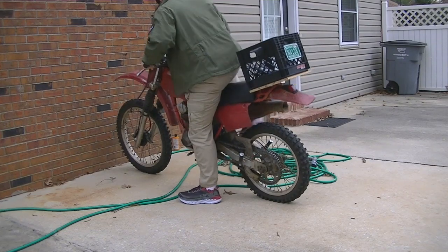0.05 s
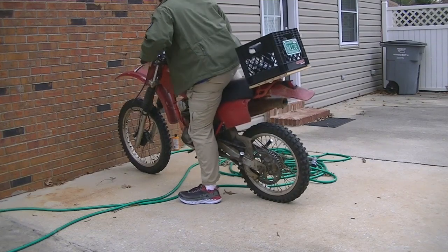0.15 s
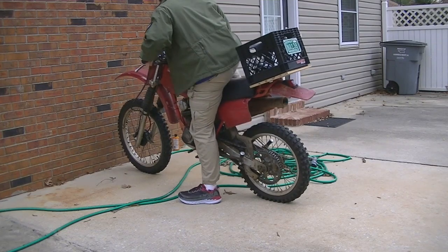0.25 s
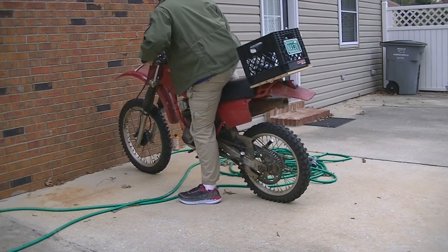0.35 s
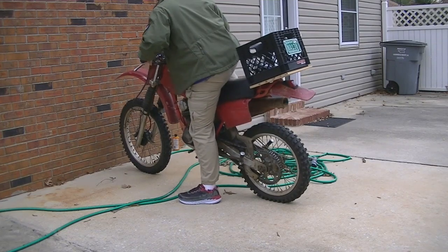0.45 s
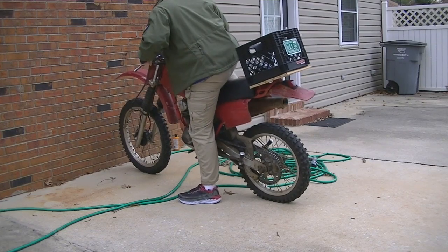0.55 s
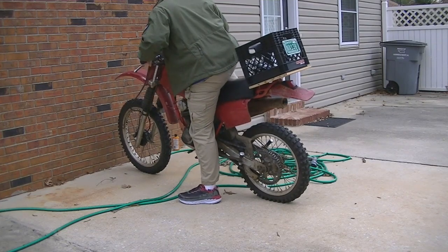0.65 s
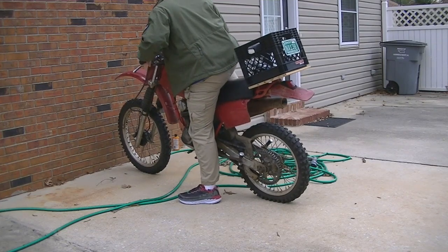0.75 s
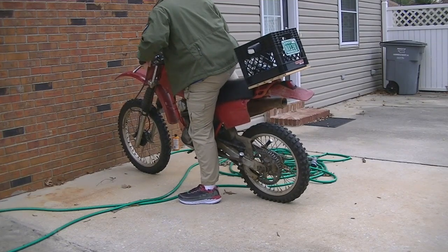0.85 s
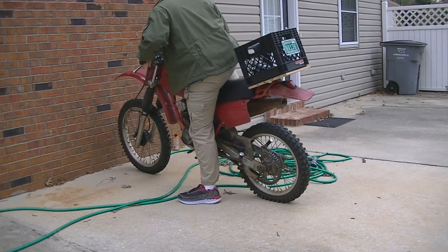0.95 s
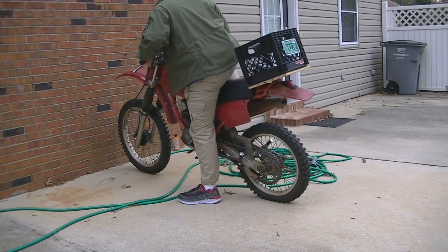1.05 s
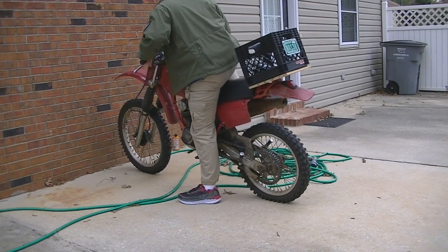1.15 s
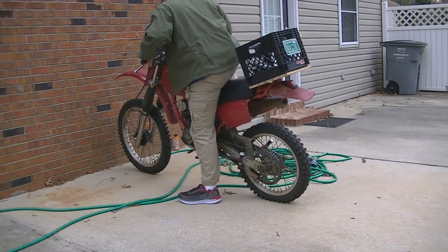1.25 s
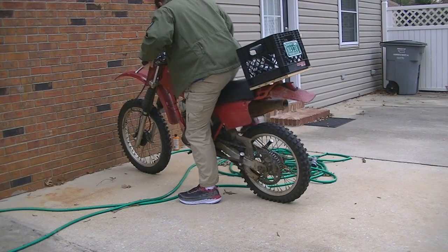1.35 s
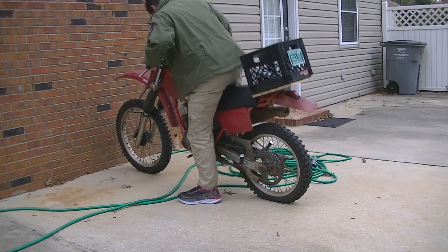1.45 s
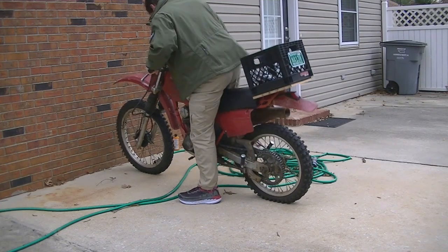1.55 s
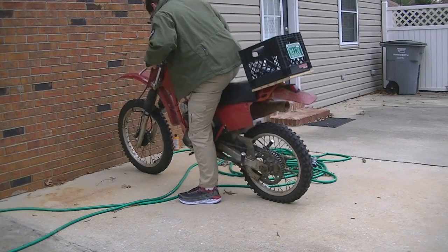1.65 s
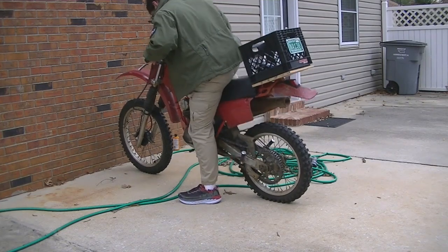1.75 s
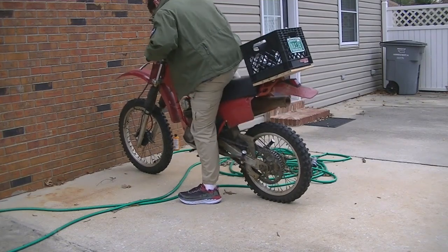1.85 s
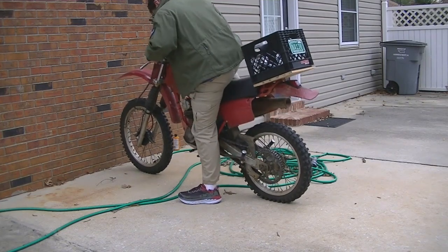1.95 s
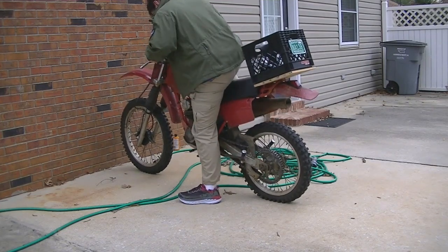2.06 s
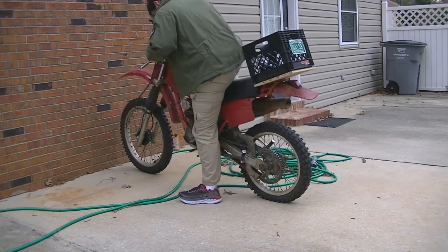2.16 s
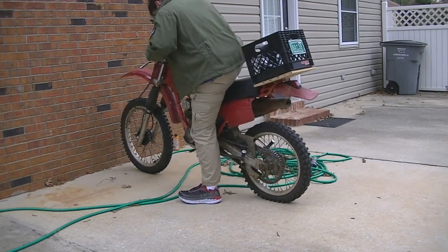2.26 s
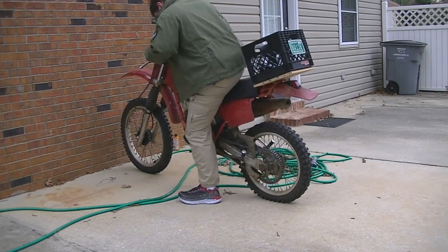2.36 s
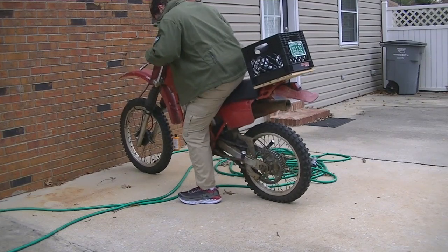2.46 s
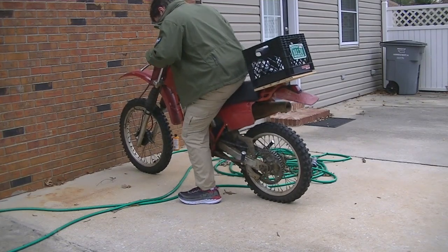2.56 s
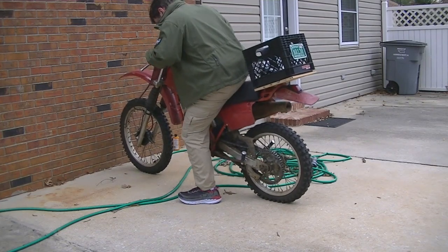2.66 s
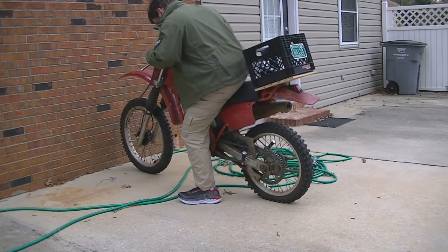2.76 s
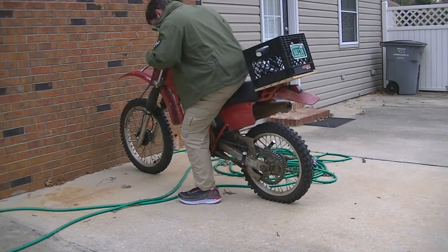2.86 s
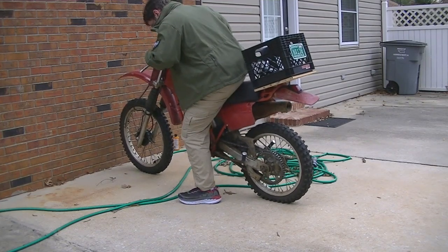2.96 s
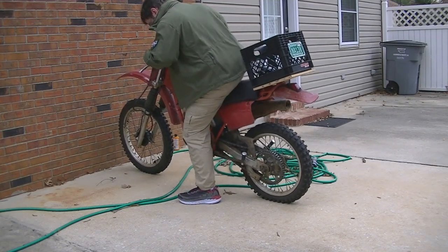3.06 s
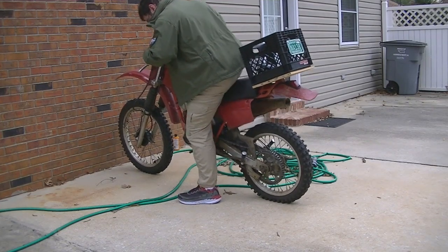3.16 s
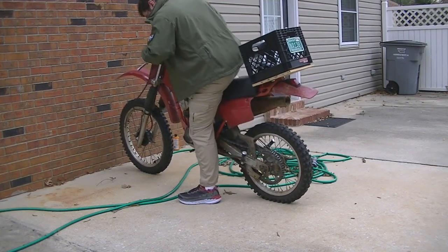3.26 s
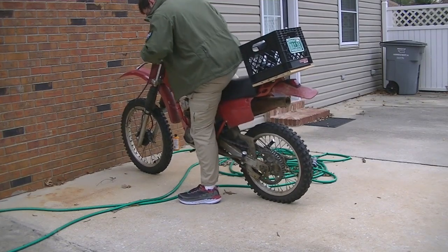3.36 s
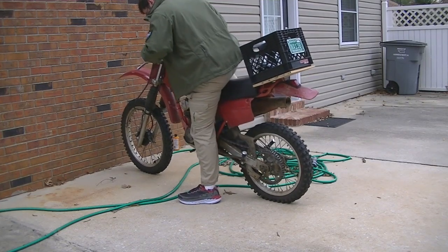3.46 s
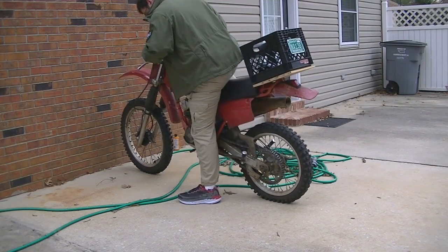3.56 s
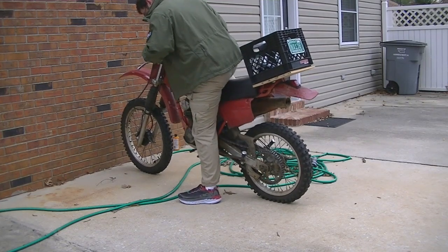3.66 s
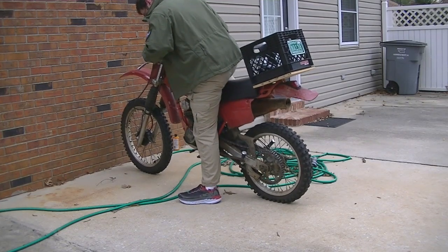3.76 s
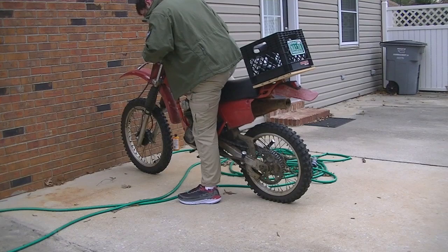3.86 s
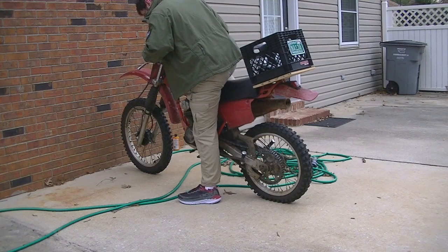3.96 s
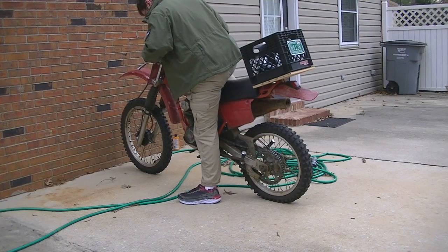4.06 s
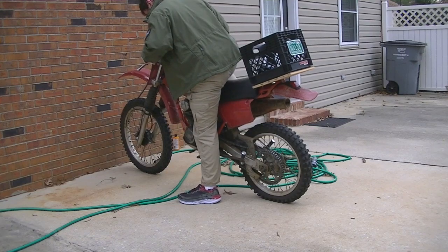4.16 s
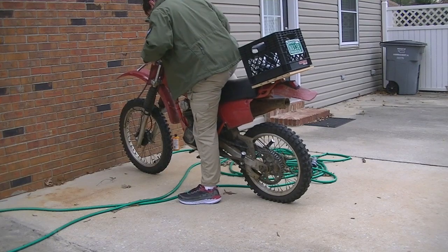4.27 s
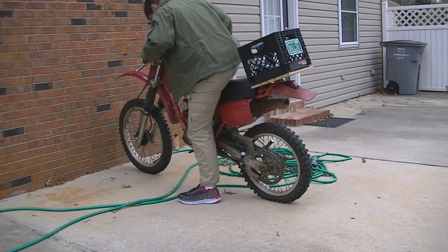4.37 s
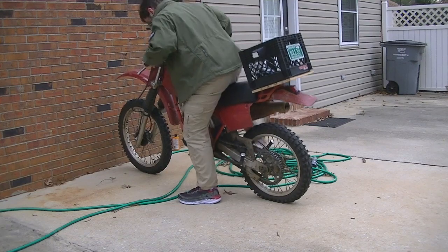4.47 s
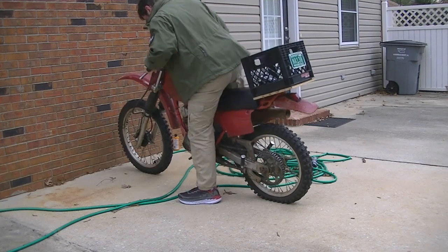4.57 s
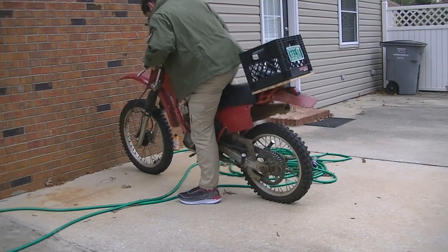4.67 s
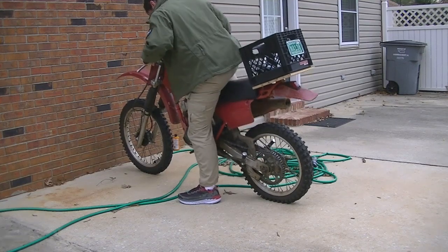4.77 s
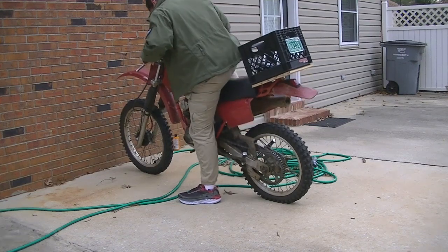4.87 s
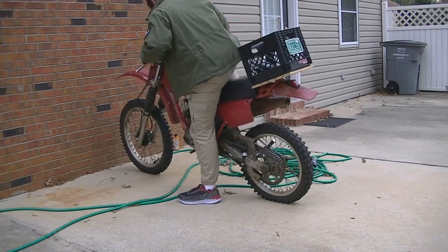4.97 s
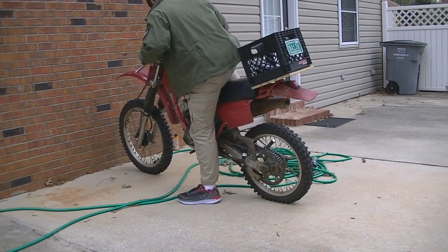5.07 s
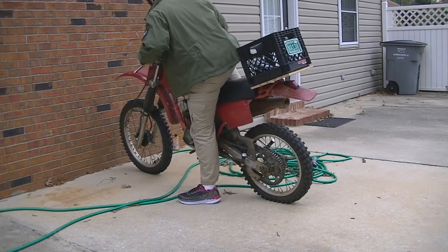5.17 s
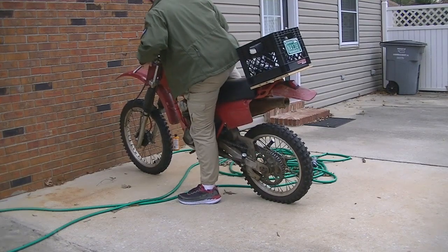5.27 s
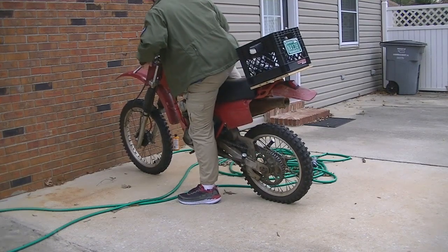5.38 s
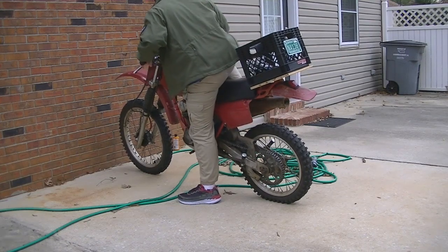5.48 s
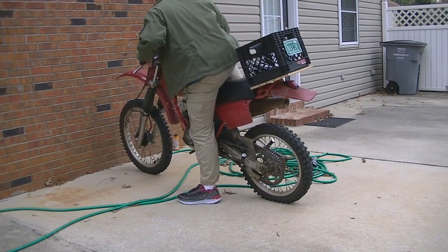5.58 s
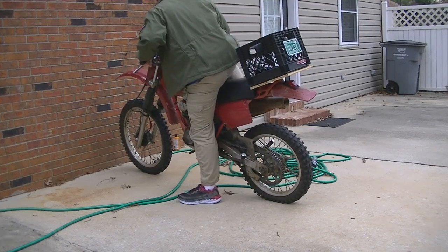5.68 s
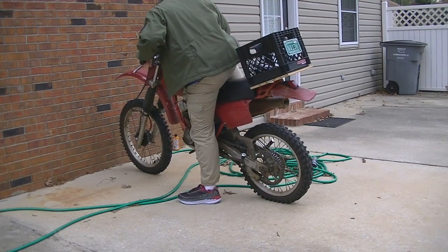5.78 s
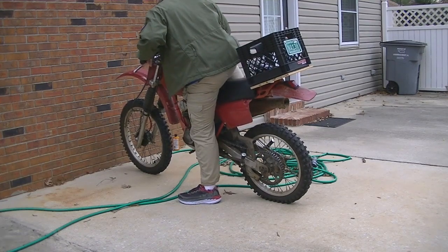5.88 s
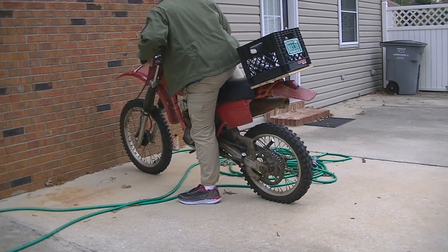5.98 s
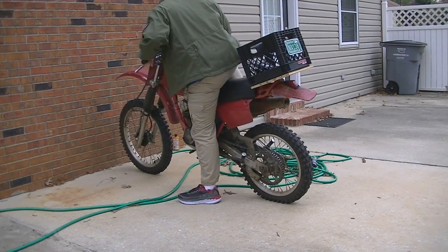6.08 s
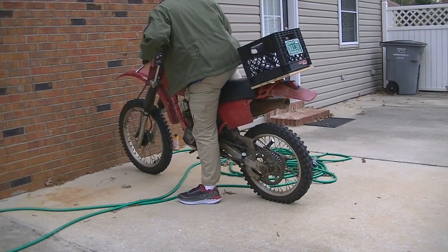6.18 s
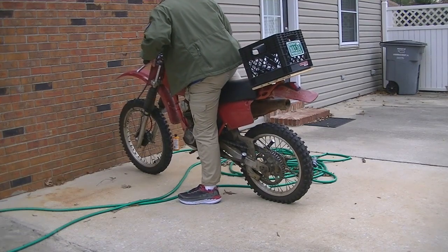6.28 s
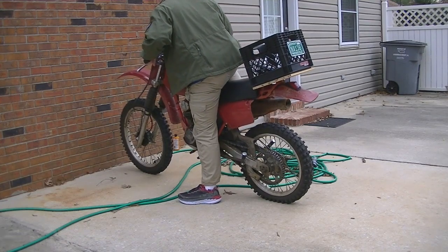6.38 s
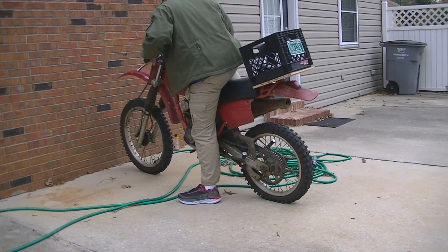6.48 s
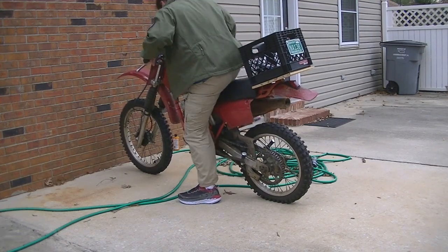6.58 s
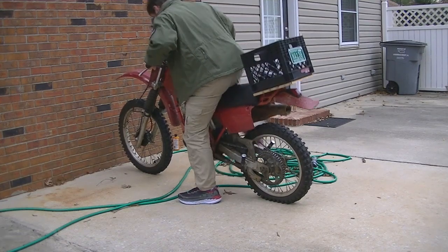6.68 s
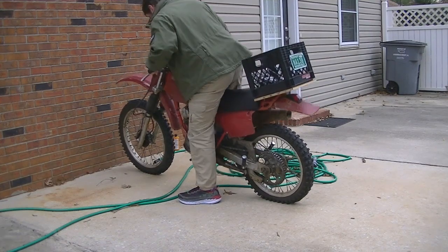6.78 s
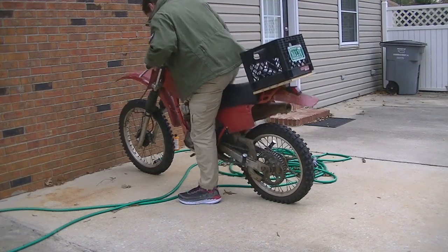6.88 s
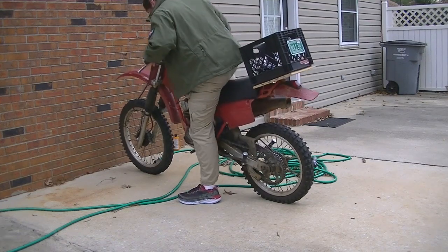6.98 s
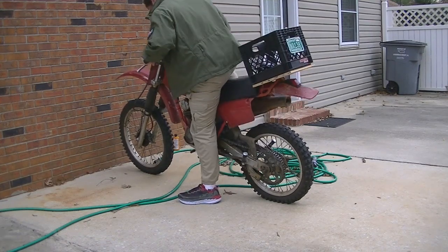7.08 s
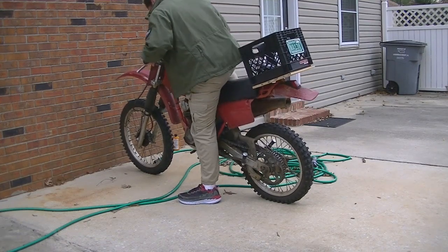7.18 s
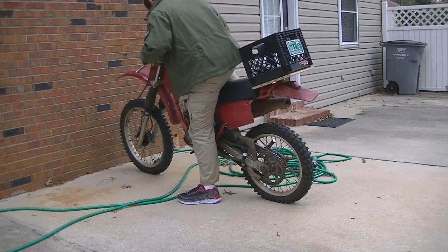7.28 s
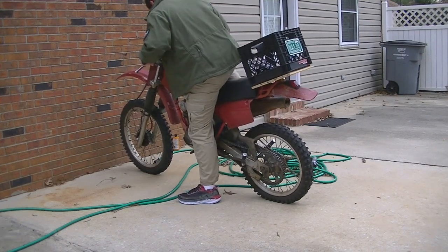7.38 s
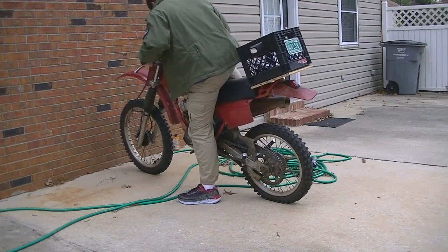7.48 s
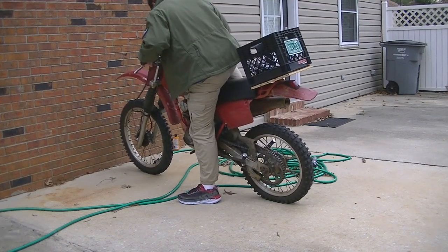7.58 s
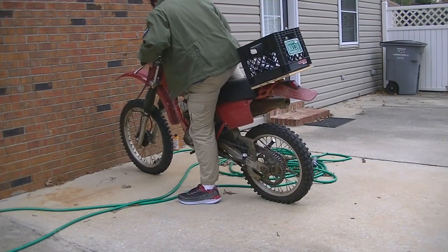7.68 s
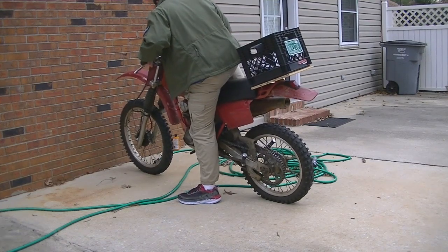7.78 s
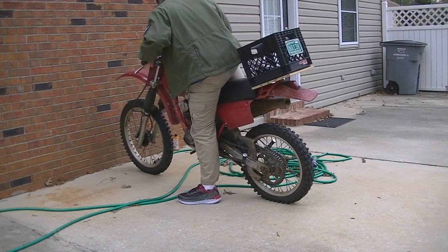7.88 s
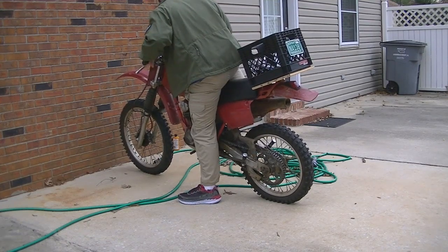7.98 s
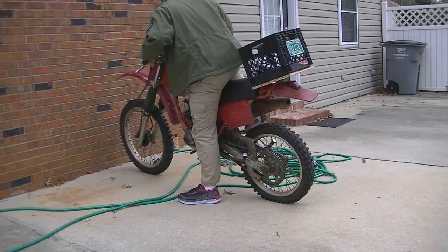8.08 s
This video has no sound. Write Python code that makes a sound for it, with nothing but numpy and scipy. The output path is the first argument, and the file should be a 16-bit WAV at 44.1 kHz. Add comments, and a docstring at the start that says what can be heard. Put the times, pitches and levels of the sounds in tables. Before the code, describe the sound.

Throughout, a quiet outdoor hush and the low wavering drone of two distant engines, perhaps mowers, sit behind close metallic sounds. In the first 0.5 s a foot sets a loose kick lever: quick taps, a short gear rattle, small clinks and a thin squeak. Sparse dull taps lead to the first kick around 1.4 s, a sharp clanking burst with rubbing squeaks, ticking gears and low airy piston gulps; the lever clacks back at 1.8 s. Soft taps, a clink and a tiny crank turn follow until 3.6 s. The second kick at 4.5 s has a heavier knock and longer whir, returning at 4.9 s. After a quieter gap, the third, at 6.7 s, brings the deepest gulp and thud, with the lever back at 7.1 s. Jingles, light taps and slight gear movement end it near 8 s. A faint wall echo follows the blows; the engine never starts.

```python
"""Two far engines, perhaps mowers, drone under an outdoor hush throughout: wavering harmonics over shaped noise.
First a foot sets the loose kick lever of a dirt bike beside a brick wall, with taps, jingles and a squeak.
Then come three kicks, near 1.4, 4.5 and 6.7 s: bursts of tiny contacts ring the metal, the frame thuds, the gears
tick as they spin, and piston strokes gulp in the airbox. After each kick the lever clacks back and bounces once.
Taps, jingles and small turns of the crank fill the gaps; the single-cylinder engine never catches."""
import sys
import numpy as np
from scipy import signal
from scipy.fft import rfft, irfft, next_fast_len
from scipy.io import wavfile
from scipy.ndimage import uniform_filter1d

SR = 44100
rng = np.random.default_rng(int(sys.argv[2]) if len(sys.argv) > 2 else 0)


def bounce(signal):
    """Save signal as a 16-bit WAV file at the path given by the first command-line argument."""
    frames = np.transpose(np.atleast_2d(signal))
    limited = np.clip(frames, -1, 1)
    pcm = np.round(limited * 32767).astype(np.int16)
    wavfile.write(sys.argv[1], SR, pcm)


N = 358533
T = np.arange(N) / SR  # time in seconds


def undb(db):
    """Turn a level in dB into a gain."""
    return 10 ** (np.asarray(db) / 20)


def unit(x):
    """Scale a sound to an rms of 1."""
    return x / np.sqrt(np.mean(x ** 2))


def curve(rows):
    """Join (seconds, value) points by straight lines over the whole scene."""
    rows = np.array(rows)
    return np.interp(T, rows[:, 0], rows[:, 1])


def decay(t, t60):
    """Die away by 60 dB in t60 seconds."""
    return np.exp(-np.log(1000) * t / t60)


def walk(rate):
    """Wander smoothly and at random around 0, with about `rate` new steps a second and a spread near 1."""
    step_size = int(SR / rate)
    steps = rng.standard_normal(1024)[np.arange(N) // step_size % 1024]
    smooth = uniform_filter1d(uniform_filter1d(steps, step_size), step_size)
    return 1.3 * smooth


def body(x, colour, modes=(), tilt_db=0):
    """Pass x through a solid or the air: broad colour, a treble tilt about 2 kHz, and ringing modes."""
    size = 2 * next_fast_len(len(x))
    f = np.maximum(np.arange(size // 2 + 1) * SR / size, 1)
    hz, db = np.transpose(colour)
    gain_db = np.interp(np.log(f), np.log(hz), db)
    gain_db = gain_db + tilt_db * np.log2(np.maximum(f, 300) / 2000)
    # folding the cepstrum makes the colour causal: nothing sounds before the blow
    cepstrum = irfft(np.log(undb(gain_db)))
    cepstrum[1:size // 2] *= 2
    cepstrum[size // 2 + 1:] = 0
    causal_colour = np.exp(rfft(cepstrum))
    ring = 1 + sum(undb(peak) / (1 + 2j * (f - centre) / width) for centre, width, peak in modes)
    return irfft(rfft(x, size) * causal_colour * ring)[:len(x)]


def add(out, at, sound, db):
    """Mix in a sound so that its loudest 5 ms have the given level."""
    start = max(int(at * SR), 0)
    peak = np.sqrt(uniform_filter1d(sound ** 2, size=220).max())
    out[start:start + len(sound)] += (sound * undb(db) / peak)[:N - start]


def blows(table, colour, modes, rise_s, chatter_s, crack, crack_s=0.0011, place_db=0.5):
    """Strike a part: a first crack, then tiny contacts that chatter, die away and ring it."""
    out, t = np.zeros(N), T[:SR // 3]
    loudest_db = max(row[1] for row in table)
    for at, db, tilt_db, t60 in table:
        contacts = np.sign(rng.standard_normal(len(t)))
        chatter = (1 - np.exp(-t / rise_s)) * decay(np.maximum(t - chatter_s, 0), t60)
        # the harder the blow, the stronger its opening crack
        hardness = undb(db - loudest_db)
        first_crack = crack * hardness * t / crack_s * np.exp(1 - t / crack_s)
        # the place that is struck decides how strongly each mode answers
        woken = [(hz, width, peak + place_db * rng.standard_normal()) for hz, width, peak in modes]
        add(out, at, body(contacts * (chatter + first_crack), colour, woken, tilt_db), db)
    return out


# Colour of the outdoor air. Each row: pitch in Hz, level in dB.
AIR_COLOUR = [(20, -42), (40, -19), (76, -8.5), (111, -7.5), (137, -9.5), (200, -7.5), (309, -8),
              (480, -9.5), (887, -7), (1150, -12.5), (1600, -17), (2400, -26.5), (4500, -31.5),
              (8830, -38.5), (16000, -45.5)]
# Loudness of the low part of the hush. Each row: time in seconds, level in dB.
RUMBLE_LEVEL = [(0, -47), (1.2, -46.5), (2.4, -48), (3.7, -48.3), (5.3, -46.2), (6.5, -46.8), (8.13, -48.3)]
HISS_DB = -57.1  # the steady hiss above


def hush(flicker_db=.5):
    """Far exhaust and traffic noise below about 2 kHz, flickering in level, with a smooth hiss above."""
    air = body(rng.standard_normal(N), AIR_COLOUR)
    low = signal.sosfiltfilt(signal.butter(2, 2300, fs=SR, output="sos"), air)
    rumble = unit(low) * undb(curve(RUMBLE_LEVEL) + flicker_db * walk(18))
    hiss = unit(air - low) * undb(HISS_DB)
    return rumble + hiss


def far_engine(hz, lines, waver_db):
    """Harmonics of a distant engine; each one fades in and out on its way through the air."""
    turn = 2 * np.pi * np.cumsum(hz) / SR
    out = 0
    for multiple, db in lines:
        strength = np.sqrt(2) * undb(db + waver_db * walk(4.4))
        out = out + strength * np.sin(round(multiple) * turn + rng.uniform(0, 2 * np.pi))
    return out


FIRING_HZ = 26.88  # average firing rate of the first engine
# Harmonics of the first engine. Each row: multiple of the firing rate, level in dB.
FIRST_LINES = [(2, -69), (3, -68), (4, -64.5), (5, -51), (6, -53.5), (7, -63.5), (8, -60), (9, -66),
               (13, -70.5), (14, -62), (16, -64), (19, -65.5), (24, -61), (32, -71)]
# Pitch of the second engine. Each row: time in seconds, pitch in Hz.
SECOND_PITCH = [(0, 128.5), (.7, 127.2), (3.3, 126.1), (4.1, 126.6), (5.5, 126.4), (6.5, 125.5),
                (7.3, 126.5), (8.13, 126)]
# Harmonics of the second engine, without its octave. Each row: multiple of its pitch, level in dB.
SECOND_LINES = [(1, -53.5), (3, -65), (4, -66.5), (5, -82)]
# The second engine's octave, before it beats. Each row: time in seconds, level in dB.
OCTAVE_LEVEL = [(0, -60), (2.3, -51.3), (3.2, -55.5), (4, -54.5), (5.7, -66), (6.5, -52.5), (7.3, -60)]
BEAT_S, BEAT_PEAK_S = .85, 2.28  # time from swell to swell, and the moment of one swell
BEAT_DB = -3  # the close tone against the octave


def mowers():
    """Two engines hold wavering pitches; the second one's octave swells as if beating with a close tone."""
    first = far_engine(FIRING_HZ * (1 + .002 * walk(3)), FIRST_LINES, waver_db=1.5)
    pitch_hz = curve(SECOND_PITCH) * (1 + 0.0019 * walk(5))
    second = far_engine(pitch_hz, SECOND_LINES, waver_db=1.5)
    beat = np.abs(1 + undb(BEAT_DB) * np.exp(2j * np.pi * (T - BEAT_PEAK_S) / BEAT_S))
    octave = beat * far_engine(pitch_hz, [(2, curve(OCTAVE_LEVEL))], waver_db=1.2)
    return first + second + octave


# Small quick turns of the crank, before, between and after the kicks.
# Each row: time in seconds, gear level in dB.
NUDGES = [(0, -43), (2.43, -52), (7.98, -55), (8.1, -51)]
SPIN_LAG_S = .02  # the gears are loudest this long after the push
SPIN_UP_DB_PER_S, COAST_DB_PER_S, SPIN_UNEVEN_DB = 330, 54, 1
TURN_S, COMPRESSION_DB = .115, 3.6  # one turn of the crank, and how far compression quietens the gears


def crank_spin():
    """A push winds the gear noise up fast, it holds, then coasts down; compression dips it on every turn."""
    pushes = [(bite, free_s, db) for bite, *_, free_s, db in KICKS]
    pushes += [(at, 0, db) for at, db in NUDGES]
    spin = 0
    for at, free_s, db in pushes:
        age = T - at
        wind_up = SPIN_UP_DB_PER_S * np.maximum(SPIN_LAG_S - age, 0)
        coast = COAST_DB_PER_S * np.maximum(age - SPIN_LAG_S - free_s, 0)
        compression = COMPRESSION_DB * np.sin(np.pi * np.maximum(age, 0) / TURN_S) ** 2
        spin = spin + undb(db - wind_up - coast - compression)
    return spin * undb(SPIN_UNEVEN_DB * walk(35))


# Broad colour of the gears. Each row: pitch in Hz, level in dB.
GEAR_COLOUR = [(80, -52), (200, -12), (350, 11.5), (550, -4.5), (1200, 2), (2000, 1.5), (2800, -2),
               (5000, -3), (8000, -9), (12000, -15.5), (16000, -23)]
# Ringing of the engine case, which gears and knocks both wake. Each row: pitch in Hz, width in Hz, level in dB.
CASE_MODES = [(595.7, 20, 5.5), (753, 39, -1), (887, 17, -0.5), (1026, 17, 1.5), (1207, 14, -1.5),
              (1340, 55, -4), (2025, 24, 2), (2133, 42, 4), (2684, 90, 1), (3100, 45, 3), (3100, 12, -1),
              (3994, 8.5, -1), (5600, 64, -19), (6650, 37, -5)]


def gears(tooth_hz=130, slow_dullness=0.2):
    """Ratchet teeth and chain links tick over sliding gears; a faster crank is louder, brighter and quicker."""
    spin = crank_spin()
    speed = (spin / spin.max()) ** .2
    teeth = np.cumsum(tooth_hz * speed * np.exp(.35 * walk(120))) / SR
    # every tooth bites with its own strength and dies away before the next
    tooth_bite = undb(rng.uniform(-11, 1, 4096))[teeth.astype(int) % 4096]
    ticks = uniform_filter1d(2 * tooth_bite * np.exp(-(teeth % 1) / .3), 60)
    rub = np.sign(rng.standard_normal(N)) * (.25 + speed * ticks)
    ring = body(rub, GEAR_COLOUR, CASE_MODES)
    dull = signal.sosfilt(signal.butter(1, 4000, fs=SR, output="sos"), ring)
    return spin * unit(ring + slow_dullness * (1 - speed) * (dull - ring))


# The loose lever set with the foot.
# Each row: time in seconds, level in dB, treble tilt in dB per octave, time to fade by 60 dB in seconds.
LEVER_TAPS = [(.024, -31, 1.5, .08), (.162, -41.5, 2.5, .14), (.207, -23.5, 2.5, .07),
              (.257, -30.5, .5, .085), (.412, -44.5, -1.5, .09), (.893, -43, -5, .055),
              (1.033, -46, -6, .04), (1.282, -41.7, -7, .1), (2.066, -39.3, -7, .2), (2.264, -40, -6, .045),
              (2.412, -42, -4, .09), (3.261, -42.5, -9.5, .07), (3.289, -49, 2.5, .06),
              (3.385, -47.5, -5, .055), (3.538, -39.5, -4, .06), (3.629, -42.5, -10, .18),
              (5.095, -41, .5, .03), (5.435, -49, -1, .03), (7.454, -48.5, 2, .04),
              (7.869, -44.5, -2.5, .03), (7.927, -38, -3.5, .055)]
# Stray touch of the boot: level in dB, treble tilt in dB per octave, time to fade by 60 dB in seconds.
FAINT_TAP = (-51, -2, .05)


def lever_taps(count=1):
    """The foot sets the lever, with `count` stray touches at random moments."""
    return LEVER_TAPS + [(at, *FAINT_TAP) for at in rng.uniform(0, T[-1], count)]


# Broad colour of the kick lever. Each row: pitch in Hz, level in dB.
LEVER_COLOUR = [(100, -34), (600, -5), (1000, -4.5), (1500, 1), (3000, -0.5), (3600, -7), (4700, -6.5),
                (7000, -14), (10000, -24.5), (16000, -36)]
# Ringing of the kick lever. Each row: pitch in Hz, width in Hz, level in dB.
LEVER_MODES = [(1395, 56, 4.1), (1580, 12, 2.6), (1687, 55, 7.3), (2066, 29, 2), (2625, 44, 2.4),
               (2830, 75, 4.2), (3094, 86, 4), (3700, 22, 1.8), (4150, 20, 11), (4560, 24, 1.7),
               (4840, 20, 2.4), (6330, 13, 4), (7500, 35, 3)]


def lever_clacks(kick_clacks):
    """Foot taps and the kicks' own clacks ring the lever."""
    return blows(kick_clacks + lever_taps(), LEVER_COLOUR, LEVER_MODES, rise_s=0.0013, chatter_s=0.0095, crack=0.67)


# Piston strokes. Each row: start in seconds, level in dB, pitch in Hz.
STROKES = [(.033, -32, 161), (1.410, -26, 164), (1.49, -27, 180), (1.57, -25.5, 153), (1.689, -36.5, 159),
           (4.481, -28.5, 164), (4.564, -23.5, 190), (4.641, -31, 156), (4.681, -34, 157),
           (4.747, -35, 169), (6.683, -15, 156.6), (6.864, -22.5, 148), (6.97, -34, 145)]
AIRBOX_T60_S = .105  # time to fade by 60 dB


def airbox(rise_s=0.0076, overtone_db=-20):
    """A gulp of the piston sets the air in the box swinging for a few cycles."""
    out, t = np.zeros(N), T[:SR // 3]
    for at, db, hz in STROKES:
        swing = np.sin(2 * np.pi * hz * t) + undb(overtone_db) * np.sin(4 * np.pi * hz * t)
        swell = 1 - np.exp(-(t / rise_s) ** 2)
        add(out, at, swing * swell * decay(t, AIRBOX_T60_S), db)
    return out


# Broad colour of the small loose parts. Each row: pitch in Hz, level in dB.
CLINK_COLOUR = [(500, -31), (2500, -8), (5000, -2.5), (8000, -1.5), (10000, -4), (12500, -7), (16000, -19)]
# Ringing of the small loose parts. Each row: pitch in Hz, width in Hz, level in dB.
CLINK_MODES = [(8150, 45, 16), (8360, 41, 12), (11400, 170, 6.2), (12400, 110, 8.3)]
# Clinks of small loose metal parts. Each row: time in seconds, level in dB, treble tilt in dB per octave.
JINGLES = [(.066, -34, 0), (.096, -38.5, -5.5), (1.933, -45, -11), (3.109, -53, -7), (4.438, -37, -7),
           (4.832, -40, 1), (5.140, -49.5, 4), (5.171, -51, 15), (6.133, -49.5, -4.5), (7.056, -44.5, 1),
           (7.118, -40.5, 15), (7.194, -50, 1), (7.321, -47.5, 1)]
JINGLE_T60_S = .085  # time to fade by 60 dB


def jingling():
    """Small loose metal parts clink, each time with a slightly different mix of the same high modes."""
    clinks = [(*jingle, JINGLE_T60_S) for jingle in JINGLES]
    return blows(clinks, CLINK_COLOUR, CLINK_MODES, rise_s=.001, chatter_s=.004, crack=0.29, place_db=2)


# Short gliding squeaks of rubbing steel, before and during the kicks.
# Each row: start in seconds, length in seconds, first pitch in Hz, last pitch in Hz, level in dB.
SCRAPES = [(0.084, 0.13, 4500, 3120, -47.5), (1.473, 0.032, 2780, 2830, -36),
           (1.66, 0.13, 5020, 4350, -45.5), (1.735, .05, 6400, 6000, -46), (1.766, .04, 3250, 3200, -46),
           (4.817, 0.067, 3480, 3000, -47), (7.035, .022, 3170, 3160, -41)]


def scrapes(width_hz=260):
    """Rubbing steel gives a narrow, rough squeak that glides in pitch."""
    out = np.zeros(N)
    narrow = signal.butter(2, width_hz / 2, fs=SR, output="sos")
    for at, length, start_hz, end_hz, db in SCRAPES:
        size = int(length * SR)
        rough = signal.sosfilt(narrow, rng.standard_normal((2, SR)))[:, :size]
        turn = 2 * np.pi * np.cumsum(np.linspace(start_hz, end_hz, size)) / SR
        squeak = rough[0] * np.sin(turn) + rough[1] * np.cos(turn)
        add(out, at, squeak * signal.get_window("cosine", size), db)
    return out


# The kicks. Each row: the pawl bites, the full weight lands, the lever hits its stop, the lever is back
# (all in seconds), knock under the weight in dB, treble tilt of the stop in dB per octave,
# return clack in dB, how long the crank spins freely in seconds, gear level in dB.
KICKS = [(1.415, 1.490, 1.511, 1.842, -26, .5, -29.8, .06, -31.3),
         (4.490, 4.564, 4.588, 4.922, -18, -1.7, -28.5, .2, -33),
         (6.680, 6.755, 6.802, 7.108, -15.5, -.7, -26, .21, -32)]
# Blows that every kick shares: slack taken up, the pawl's bite, the gears' jerk, the pawl's strain.
# Each holds: level in dB, treble tilt in dB per octave, time to fade by 60 dB in seconds.
TAKE_UP = (-38.5, -10, .1)
BITE = (-20.2, 2.1, .095)
SNATCH = (-27, -6, .12)
STRAIN = (-33.5, -5.5, .11)
# slack goes and the pawl strains before the bite, the gears jerk after it
TAKE_UP_LEAD_S, STRAIN_LEAD_S, SNATCH_LAG_S = .066, .016, .036
# the knock under the rider's weight: the softer, the duller (no tilt at the "flat" level)
WEIGHT_FLAT_DB, WEIGHT_TILT_PER_DB, WEIGHT_T60_S = -13.5, .85, .06
STOP_DB, STOP_T60_S = -9.8, .025  # the lever slamming on its stop
# the lever springing back: the harder, the brighter
RETURN_FLAT_DB, RETURN_TILT_PER_DB, RETURN_T60_S = -30.5, .55, .072
REBOUND_S, REBOUND_DB = .038, -14  # the returning lever bounces once, this much later and softer
LEAN_LEAD_S = .03  # the boot leans on the lever just before the bite
LEAN_THUD_DB, BITE_THUD_DB, WEIGHT_THUD_DB = -33, -27.5, -17.5  # the boot's push on the frame


def kick_blows():
    """List each kick's blows: slack, lean, strain, bite, jerk, weight, stop, return and bounce."""
    knocks, clacks, thuds = [], [], []
    for bite, weight, stop, back, weight_db, stop_tilt_db, back_db, _, _ in KICKS:
        weight_tilt_db = WEIGHT_TILT_PER_DB * (weight_db - WEIGHT_FLAT_DB)
        knocks += [
            (bite - STRAIN_LEAD_S, *STRAIN),
            (bite, *BITE),
            (bite + SNATCH_LAG_S, *SNATCH),
            (weight, weight_db, weight_tilt_db, WEIGHT_T60_S),
            (stop, STOP_DB, stop_tilt_db, STOP_T60_S),
        ]
        back_ring = (RETURN_TILT_PER_DB * (back_db - RETURN_FLAT_DB), RETURN_T60_S)
        clacks += [
            (bite - TAKE_UP_LEAD_S, *TAKE_UP),
            (back, back_db, *back_ring),
            (back + REBOUND_S, back_db + REBOUND_DB, *back_ring),
        ]
        thuds += [(bite - LEAN_LEAD_S, LEAN_THUD_DB), (bite, BITE_THUD_DB), (weight, WEIGHT_THUD_DB)]
    return knocks, clacks, thuds


# The frame's low ring. Each row: pitch in Hz, level in dB, time to fade by 60 dB in seconds.
FRAME_MODES = [(225.2, -2.5, 0.15), (307.7, -2.5, 0.1), (336.6, -3.5, 0.16), (387, 0.5, 0.099),
               (450, -9.5, 0.1), (740, -7, .06), (899, -6, 0.15)]


def frame(thuds, rise_s=.002):
    """A soft heavy push wakes only the low modes of the frame, a little differently each time."""
    out, t = np.zeros(N), T[:SR // 3]
    for at, db in thuds:
        ring = 0
        for k, (hz, gain_db, t60) in enumerate(FRAME_MODES):
            detune = 1 + 0.018 * rng.standard_normal()
            # neighbouring modes swing in opposite senses, so the thud builds before it fades
            strength = (-1) ** k * undb(gain_db)
            ring += strength * np.sin(2 * np.pi * hz * detune * t) * decay(t, t60)
        add(out, at, ring * (1 - np.exp(-t / rise_s)), db)
    return out


# Broad colour of the engine case. Each row: pitch in Hz, level in dB.
CASE_COLOUR = [(40, -28), (100, -16), (300, -8), (500, -12), (750, -6.5), (1050, -4.5), (1600, -7),
               (3000, -7), (5500, -9), (8000, -14), (12000, -24), (16000, -29)]
# The crank rocking back off compression. Each row: time in seconds, level in dB.
RECOILS = [(4.736, -16), (4.773, -24), (6.950, -24.5)]
# Sound of every recoil: treble tilt in dB per octave, time to fade by 60 dB in seconds.
RECOIL = (-.5, .06)


def case_knocks(kick_knocks):
    """Kicks, and the crank rocking back, ring the engine case."""
    recoils = [(*recoil, *RECOIL) for recoil in RECOILS]
    return blows(kick_knocks + recoils, CASE_COLOUR, CASE_MODES, rise_s=0.0037, chatter_s=0.009, crack=1.05)


def yard(x, wall_s=.036, wall_db=-22, tail_db=-17, low_t60=0.23, high_t60=0.56):
    """Add a slap from the wall and a faint scattered tail whose lows die before its highs."""
    t = T[:SR]
    scatter = rng.standard_normal(SR) * (1 - np.exp(-t / 0.002))
    low = signal.sosfilt(signal.butter(2, 1500, fs=SR, output="sos"), scatter)
    high = signal.sosfilt(signal.butter(2, [1500, 12000], "band", fs=SR, output="sos"), scatter)
    echo = low * decay(t, low_t60) - high * decay(t, high_t60)
    echo *= undb(tail_db) / np.sqrt(np.sum(echo ** 2))
    echo[int(wall_s * SR)] += undb(wall_db)
    return x + signal.fftconvolve(x, echo)[:N]


def scene():
    """The bike in its yard, over the distant drone and hush."""
    background = hush() + mowers()
    kick_knocks, kick_clacks, thuds = kick_blows()
    bike = gears() + lever_clacks(kick_clacks) + airbox() + jingling() + scrapes()
    bike += frame(thuds) + case_knocks(kick_knocks)
    return (yard(bike) + background)[None]


TOP_HZ = 15900  # nearly nothing passes above this


def record(dry):
    """The recorder clips at full scale, then cuts the top of the treble."""
    clipped = np.clip(dry, -1, 1)
    return signal.sosfilt(signal.ellip(10, .2, 80, TOP_HZ, fs=SR, output="sos"), clipped)


dry = scene()
out = record(dry)
bounce(out)
```